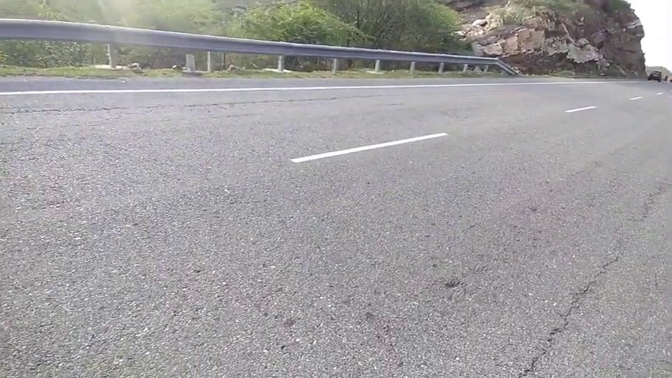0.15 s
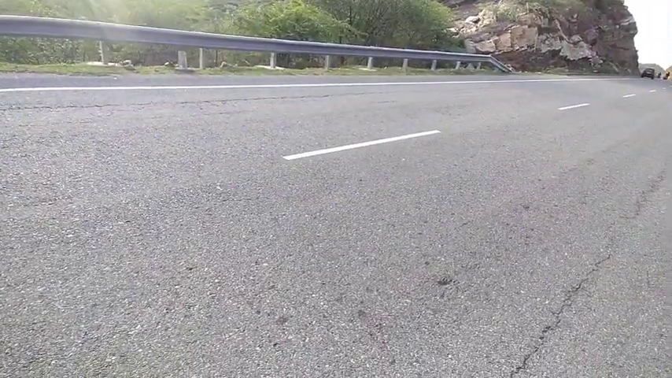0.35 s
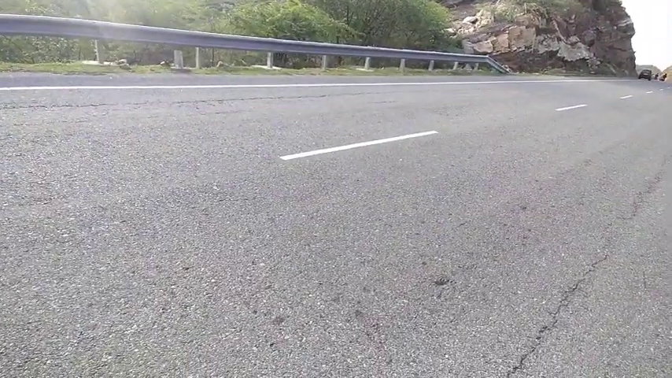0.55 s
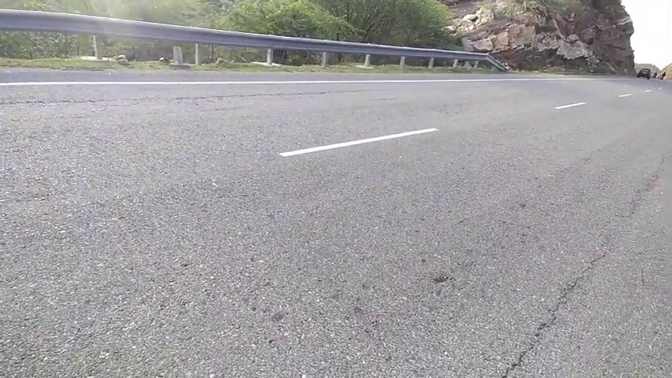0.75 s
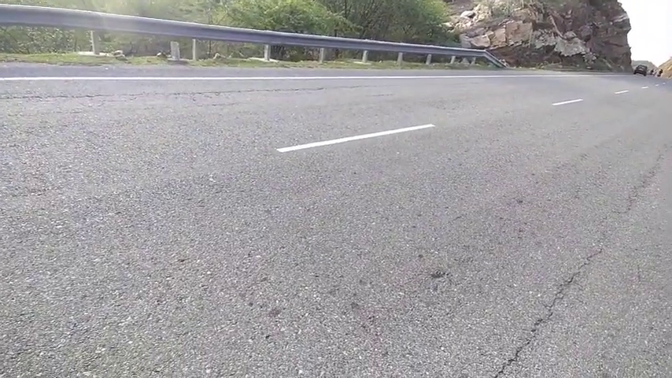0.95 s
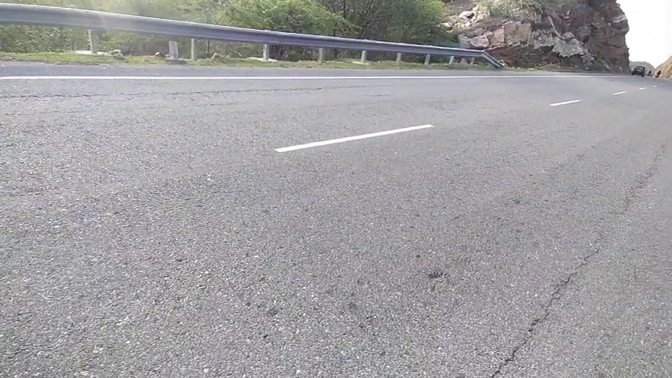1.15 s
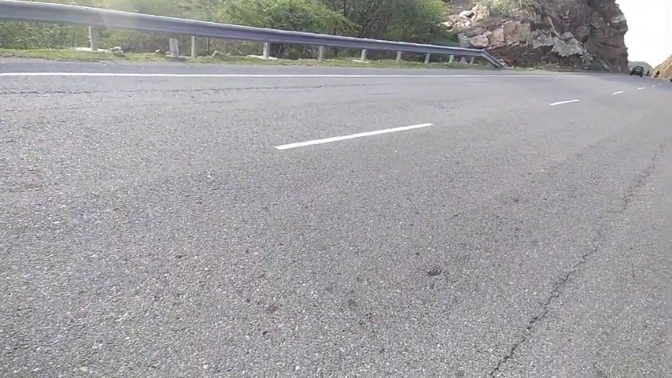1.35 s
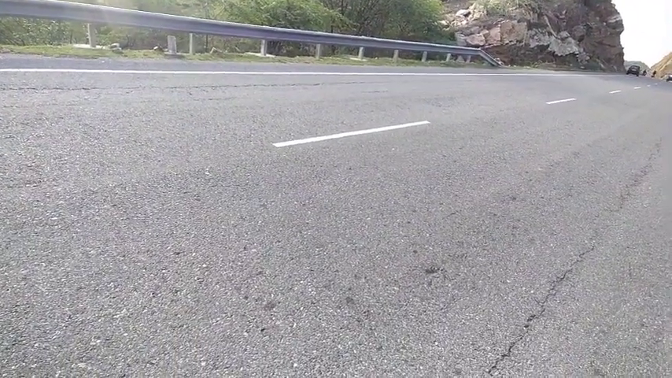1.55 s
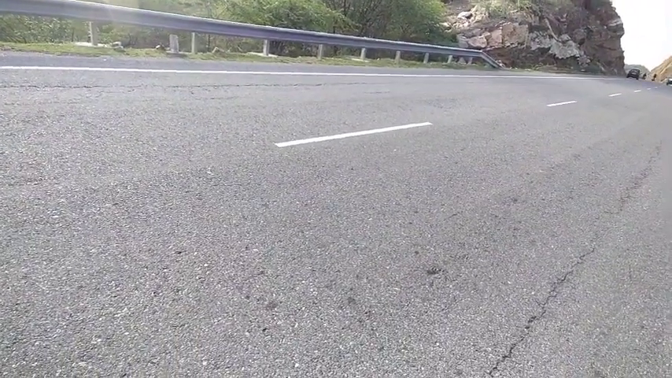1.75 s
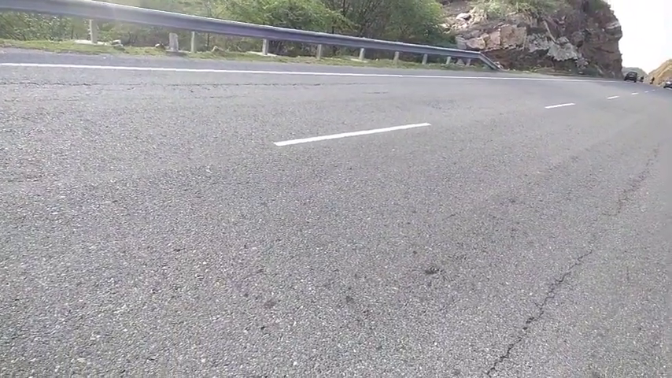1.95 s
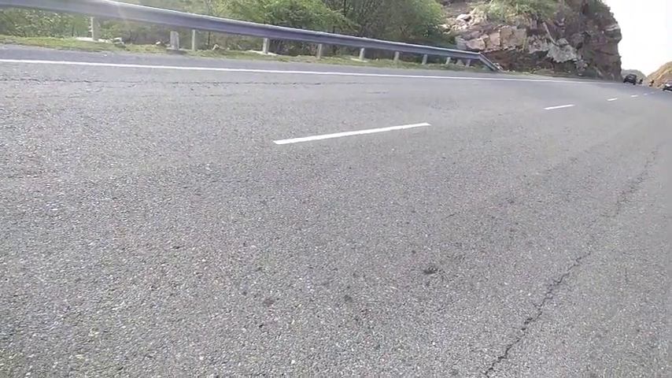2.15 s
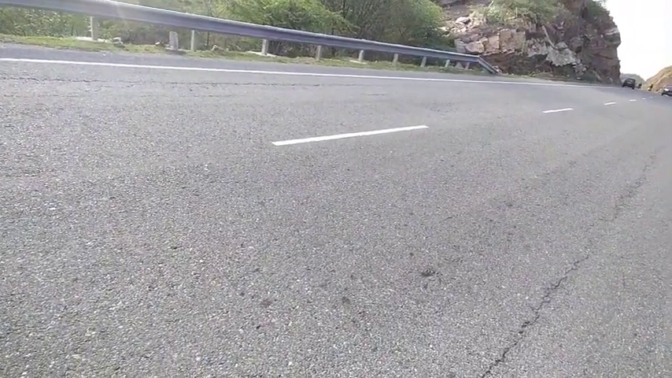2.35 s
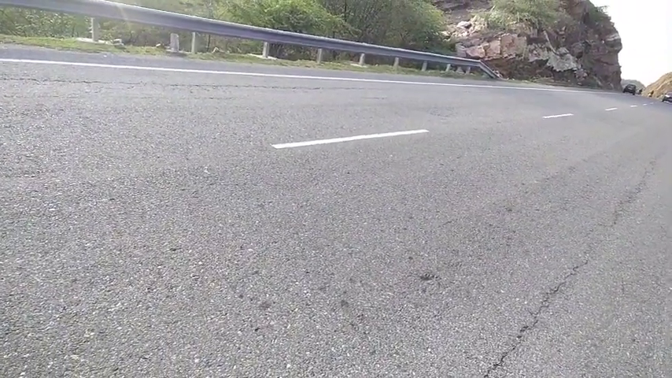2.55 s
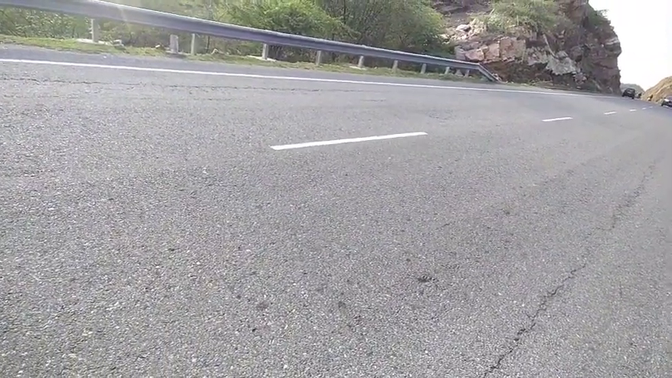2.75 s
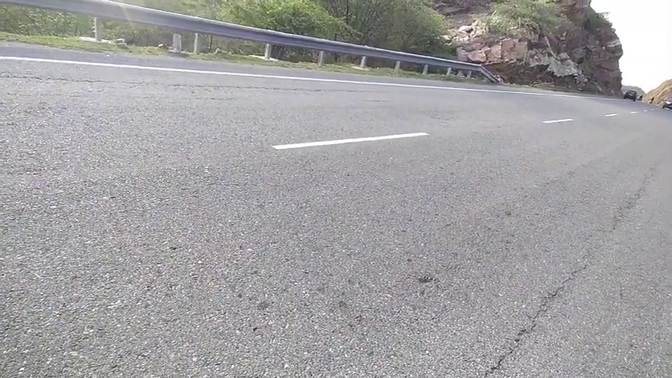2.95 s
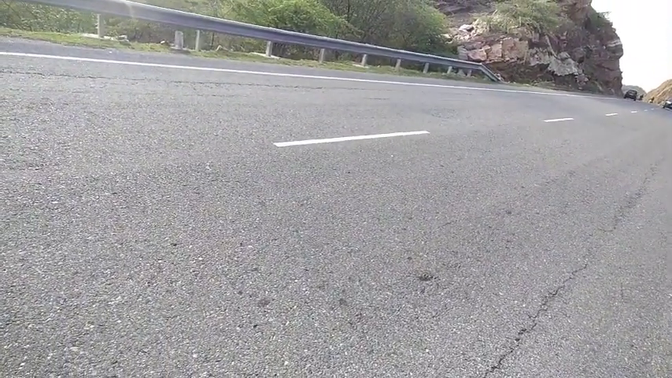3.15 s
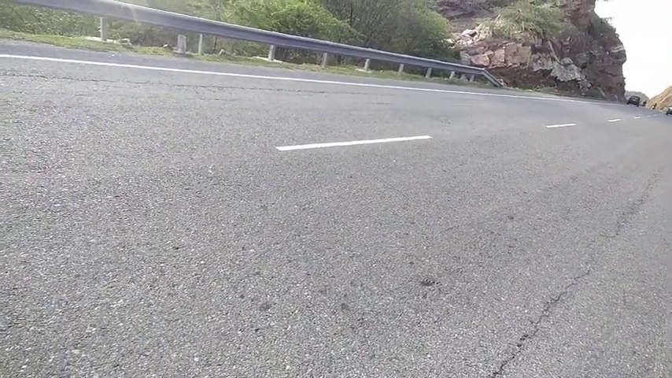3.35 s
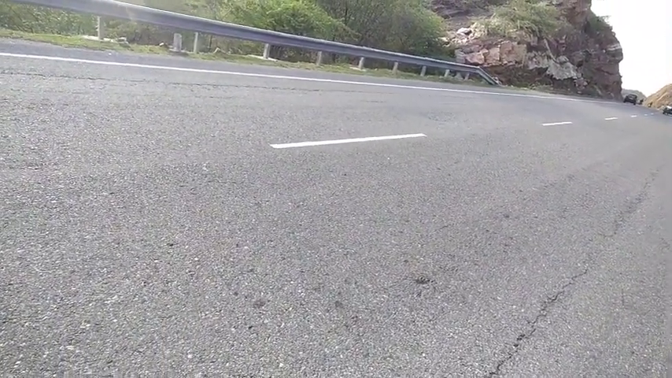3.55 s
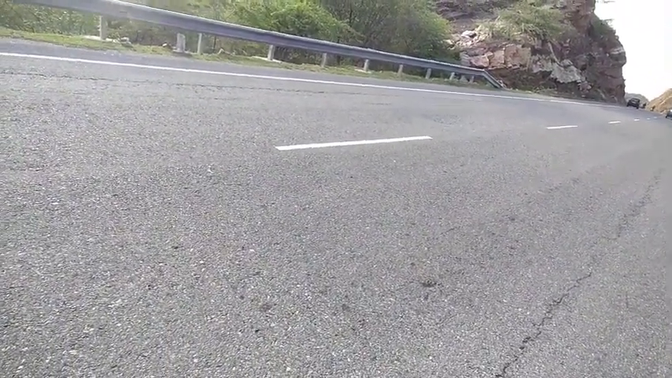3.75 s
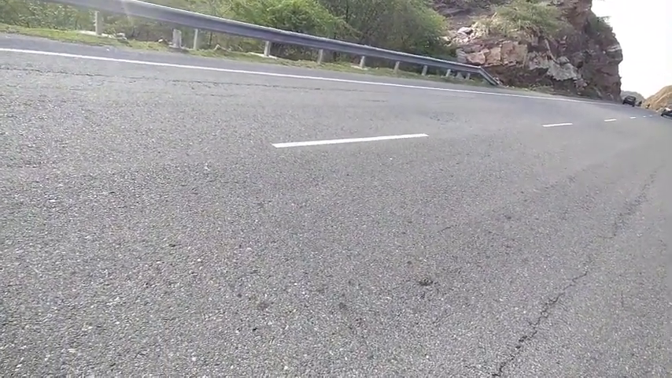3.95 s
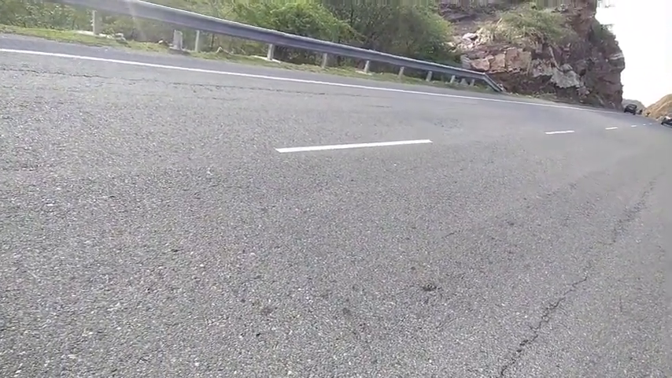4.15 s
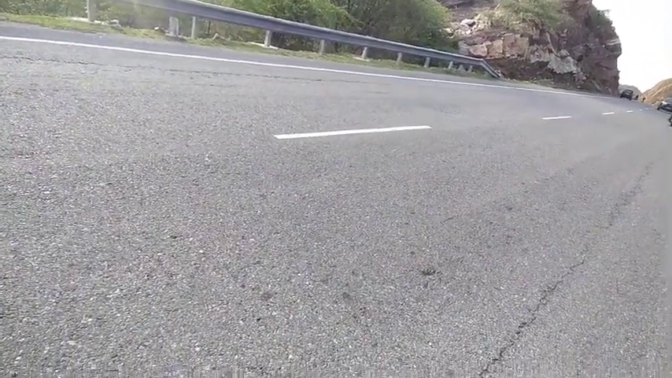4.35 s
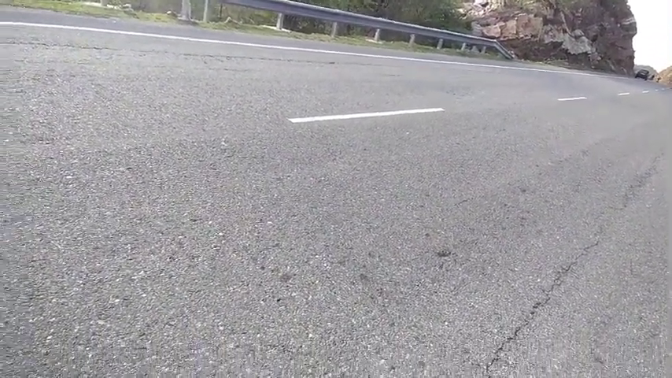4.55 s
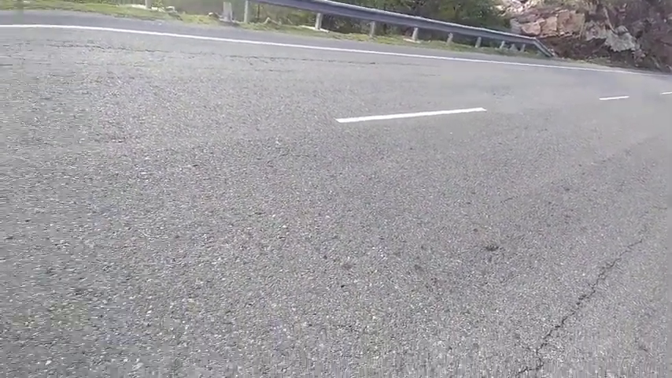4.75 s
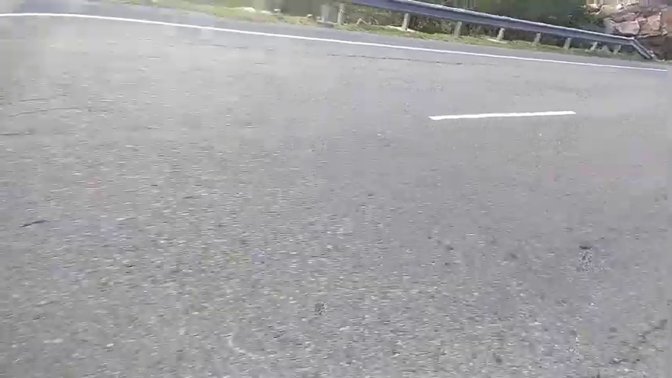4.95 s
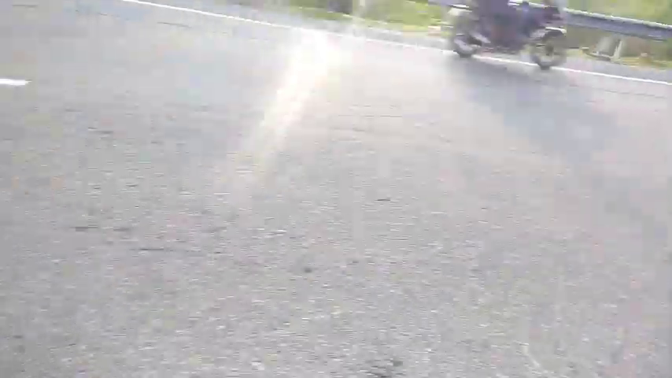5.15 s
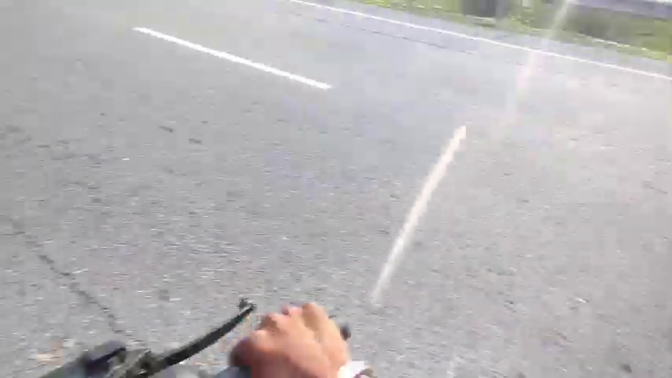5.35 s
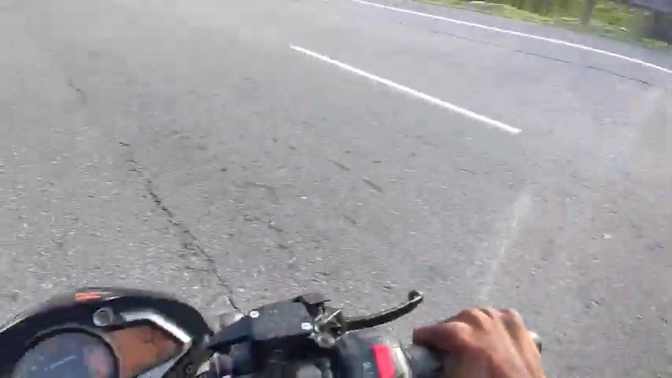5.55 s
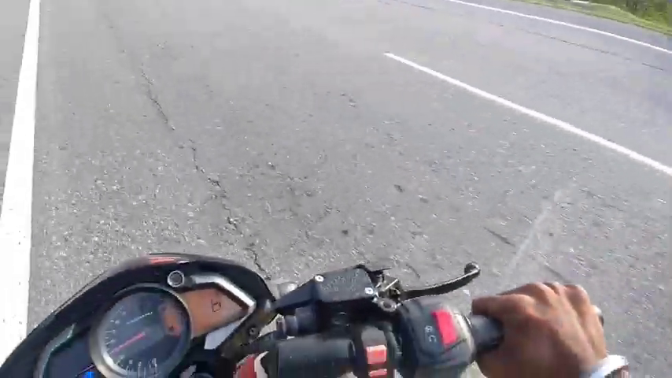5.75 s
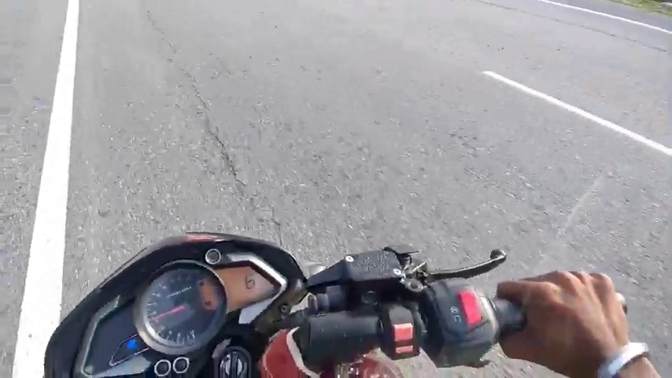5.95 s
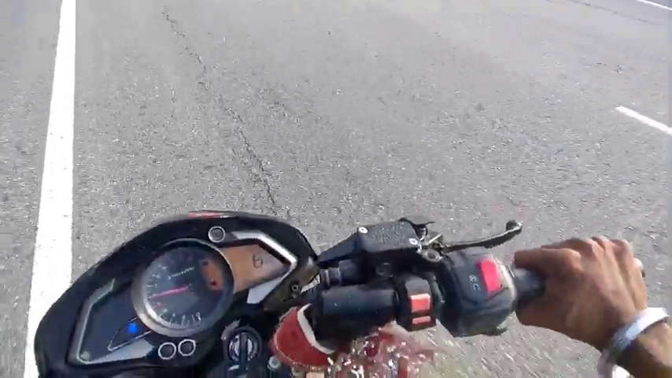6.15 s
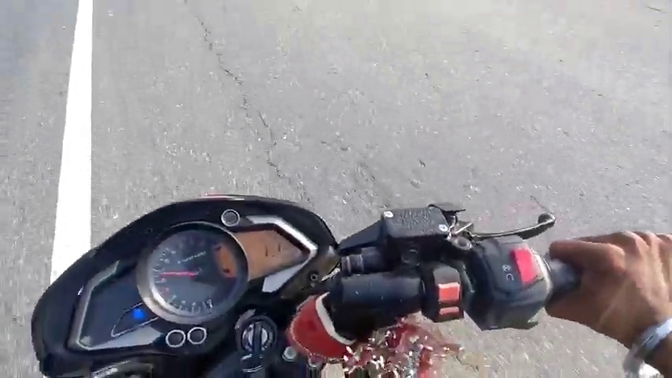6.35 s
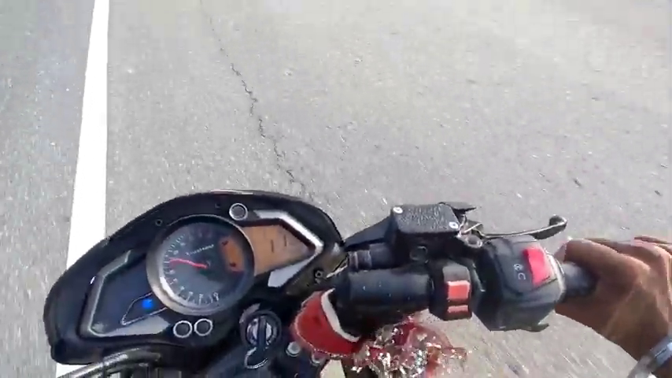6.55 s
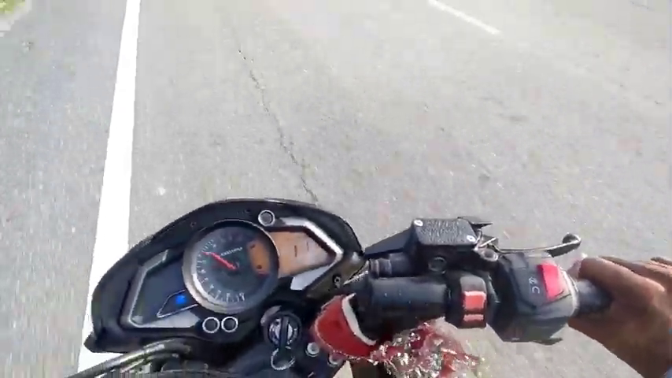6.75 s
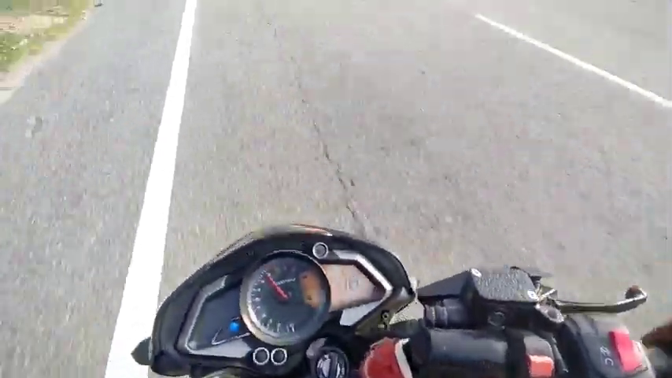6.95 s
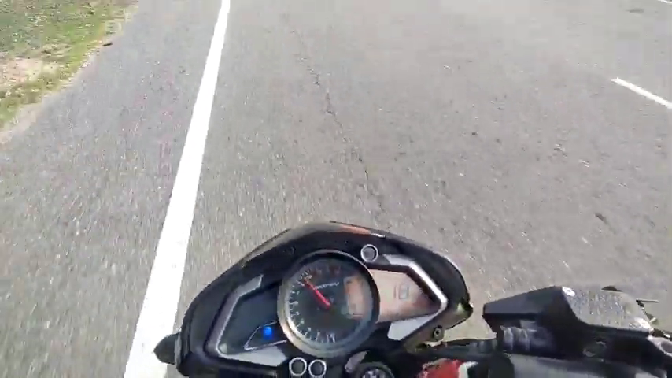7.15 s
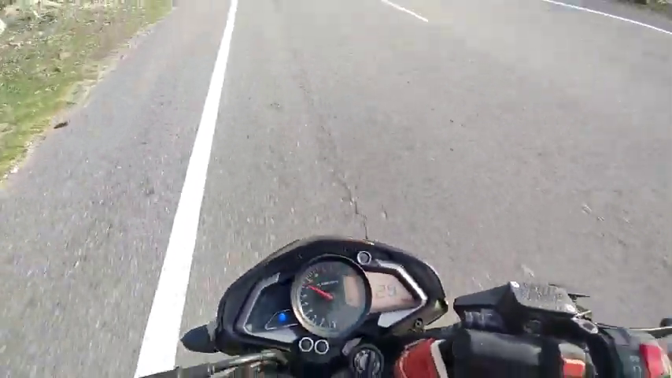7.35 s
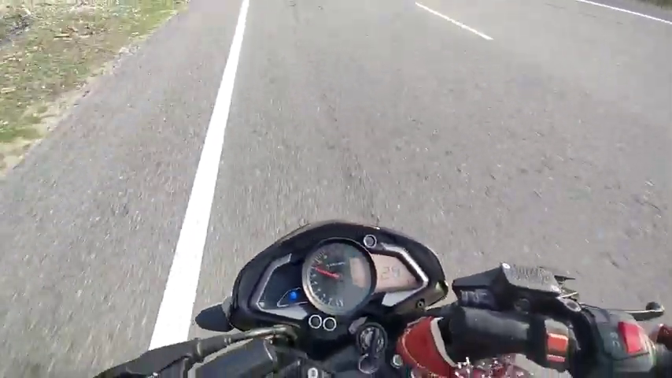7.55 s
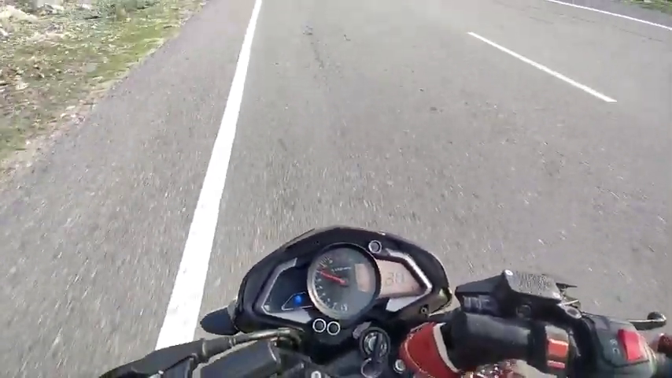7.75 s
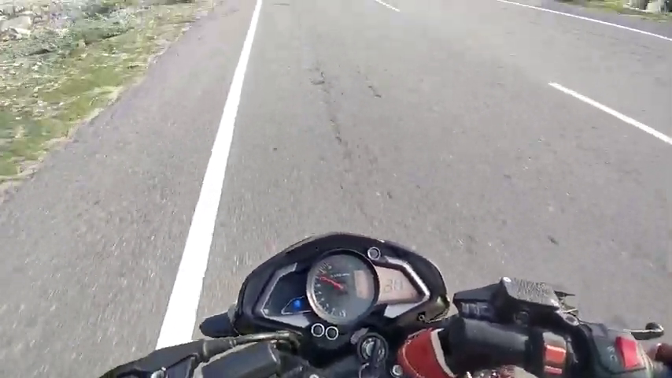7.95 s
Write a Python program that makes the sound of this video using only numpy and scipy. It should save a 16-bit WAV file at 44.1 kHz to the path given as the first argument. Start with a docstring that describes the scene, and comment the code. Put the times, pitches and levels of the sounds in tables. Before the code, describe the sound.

First, soft wind bumps and a distant bike's growing exhaust bark, which drops to a hollow overrun boom and fades. Underneath, a close single-cylinder engine ticks over slowly and revs gently. A short steel gear clunk follows, then hard acceleration with hissing, metallic chatter and high disc squeaks. After the revs dip for an upshift, ripping wind overwhelms the rider's microphone on the open road.

```python
"""On a highway, two single-cylinder motorcycles pass through wind: filtered pulse trains make their exhausts.
One cruises, gaining speed, then rolls off the throttle. The nearer one idles, is blipped, clunks into gear,
pulls away hard and shifts up; crank-locked sines and noise bursts make its intake, valves and rattles.
Shaped noise makes the wind, which buffets the microphone, grows into a tearing rush and drives a limiter.
Brief sine squeaks come from a brake disc."""
import sys
import numpy as np
from scipy import signal
from scipy.fft import rfft, irfft, next_fast_len
from scipy.io import wavfile
from scipy.ndimage import uniform_filter1d, minimum_filter1d, map_coordinates

SR = 44100
rng = np.random.default_rng(int(sys.argv[2]) if len(sys.argv) > 2 else 0)


def log_audio(samples):
    """Write samples as a 16-bit WAV file to the path given in sys.argv[1]."""
    # one column per channel
    frames = np.atleast_2d(samples).T
    # limit to full scale, then quantise
    limited = np.clip(frames, -1, 1)
    pcm = np.round(limited * 32767).astype(np.int16)
    wavfile.write(sys.argv[1], SR, pcm)


N = 356307

# Levels inside a spectrum are relative: each coloured sound is brought to rms 1 before its gain.
# firing rate of the cruising bike: time_s, firings_per_s
CRUISE_FIRING_RATE = [(0, 37.92), (0.5, 41.02), (1, 42.83), (1.8, 45.95), (2.6, 49.26), (3.0, 50.6),
                      (3.24, 51.27), (3.33, 46.69), (3.43, 47.31), (3.53, 50.24), (4, 48.26), (4.6, 46.79),
                      (5.2, 44.69), (8.08, 36.0)]
# loudness and load of the cruising bike: time_s, level_db, throttle_0_to_1
CRUISE_LEVEL_THROTTLE = [(0, -45.5, 0.85), (.7, -36.5, 0.54), (1.4, -36, 0.8), (2.2, -31, 0.98),
                         (3.22, -29.5, 0.99), (3.33, -33, 0), (3.6, -30.5, 0), (4.3, -27.5, 0.36),
                         (5, -26, 0.1), (5.6, -32, 0.44), (6.2, -38.5, 0.2), (8.08, -67, 0.16)]
# its exhaust response with the throttle open, then shut: frequency_hz, gain_db
EXHAUST_THROTTLE_OPEN = [(50, -30), (95, -1.5), (150, 3.5), (192, -7), (218, 10.5), (245, 2), (300, -5),
                         (400, -6), (440, -5), (500, -12), (585, -5.5), (655, 1.5), (735, -15),
                         (1000, -14.5), (1400, -50), (4000, -53)]
EXHAUST_THROTTLE_SHUT = [(50, -31), (95, -20), (145, 2), (195, 9.5), (240, 2.5), (300, -4.5), (380, -10),
                         (460, -2), (520, -15), (600, -6.5), (700, -10), (830, -16.5), (950, -8),
                         (1100, -20.5), (1450, -27), (4000, -40.5)]

# firing rate of the near bike: time_s, firings_per_s
NEAR_FIRING_RATE = [(0, 13.3), (.4, 12.2), (1.38, 12.2), (1.7, 15.3), (1.9, 20.5), (2.3, 26), (2.8, 26),
                    (3.25, 33.5), (3.58, 37.7), (4.3, 27.5), (5.4, 36), (5.8, 43.6), (6, 46.8),
                    (6.12, 50.3), (6.25, 54.6), (6.38, 59), (6.47, 60.5), (6.55, 65), (6.75, 69.6),
                    (6.88, 74.2), (7, 76.7), (7.15, 72.5), (7.24, 66), (7.4, 51), (7.47, 51.2), (7.65, 55),
                    (7.85, 58), (8.08, 61)]
# its twist grip (idle, a blip, pulling away, eased for the upshift, then opened a little again):
# time_s, throttle_0_to_1
NEAR_THROTTLE = [(0, 0), (1.4, 0.35), (2.3, 0.1), (3.1, 0.13), (3.4, 0.47), (3.8, 0.45), (4.2, 0.14),
                 (5.1, 0), (5.75, 0.46), (6.12, 0.73), (6.4, 0.9), (7.12, 0.97), (7.26, 0.63), (8.08, 0.75)]
# the microphone swings round towards the near engine; each sound takes a share: time_s, gain_db
FACING_GAIN = [(0, -4.5), (4.55, 2.5), (5.2, 19), (6, 16.5), (8.08, 13.5)]
# growth of each near-engine sound: level_db (at IDLE_RATE, throttle shut), db_per_doubling_of_revs,
# db_at_full_throttle, share_of_facing_gain
EXHAUST_GROWTH = (-61, 4, 16, 0.9227)
DRONE_GROWTH = (-51, 3, 24.5, 0.5052)
VALVE_GROWTH = (-60, 3, 8, 0.3545)
HISS_GROWTH = (-68, 9.5, -1, 1.0)
IDLE_RATE = 12  # firings_per_s
# response of its exhaust, then of its cylinder head: frequency_hz, gain_db
NEAR_EXHAUST_RESPONSE = [(40, -51.5), (70, -38), (95, -15), (140, 2.5), (200, -2), (250, -13), (305, 3.5),
                         (400, -7), (520, -14), (630, 1), (800, -18.5), (1500, -19), (4000, -47)]
CYLINDER_HEAD_RESPONSE = [(700, -25.5), (1500, 1.5), (2400, -2.5), (3050, 4), (3450, 7), (3700, -10.5),
                          (4300, 1.5), (5200, 8), (5600, -6), (6100, -14.5), (7000, -26)]
# modes of the engine's casing and fins: frequency_hz, width_hz, gain_db
CASING_MODES = [(1445, 64, 0.5), (1830, 120, -2.5), (2230, 27, -2), (2703, 130, 0.5), (3120, 110, -2),
                (3402, 43, -0.5), (3500, 67, -1), (3697, 29, 2.5), (3878, 34, 7), (3923, 80, -1),
                (4436, 130, -3), (4780, 140, -4), (4890, 78, -1), (5410, 59, 0), (5650, 47, 1.5)]
# the airbox lifts engine orders that sweep through its resonances: frequency_hz, gain_db
AIRBOX_RESPONSE = [(70, -25), (105, -11), (132, 2), (150, 4), (172, -5), (205, -3), (226, -14),
                   (252, -18.5), (272, -2), (300, 2), (328, -13.5), (360, -20), (400, -16.5)]
# harmonics of the intake pulse: multiple_of_firing_rate, gain_db
INTAKE_HARMONICS = [(3, -0.5), (4, 2.5), (5, -1.5), (6, -9)]
CRANK_WAVER = .009  # scale of the intake strokes' unevenness, firing cycles
FRAME_HZ, FRAME_WIDTH_HZ, FRAME_DB = 91.5, 10, -2  # frame resonance, level relative to the drone
TICK_S, OFF_TURN = 0.0044, 0.42  # decay constant of a valve tick; amplitude on the turn that does not fire

# strength of the air stream: time_s, rush_db, buffeting_db
AIR_STREAM = [(0, -54, -36.5), (1.3, -54, -35.5), (2.2, -46.5, -33.5), (3.35, -42.5, -33.5),
              (4.4, -42, -31), (5.2, -35, -26.5), (5.9, -28.5, -23.5), (6.25, -26, -20), (6.45, -25.5, -19),
              (6.62, -22, -17), (6.8, -24.5, -19.5), (7.1, -27.5, -17.5), (7.25, -19, -15),
              (7.45, -21.5, -16.5), (7.85, -20.5, -14), (8.08, -18, -15)]
SLOW_AIR_DB, FAST_AIR_DB = -37, -27  # rush levels between which the air turns from smooth to turbulent
# spectra of buffeting in slow, then fast air: frequency_hz, level_db_per_hz
SLOW_BUFFET_SPECTRUM = [(25, -42), (55, -30), (80, -10.5), (115, -1.5), (160, -1.5), (250, -6.5),
                        (400, -15), (700, -25), (1100, -30.5), (2500, -53)]
FAST_BUFFET_SPECTRUM = [(25, -40.5), (60, -26.5), (85, -14.5), (125, 1), (200, 0), (300, 0.5), (450, -7.5),
                        (620, -13.5), (760, -14), (1100, -33), (2500, -43)]
# spectra of the mild rush of tyres and air at low speed, then of fast air: frequency_hz, level_db_per_hz
SLOW_RUSH_SPECTRUM = [(300, -8), (600, 0), (850, 3), (1020, 5.5), (1250, -0.5), (1600, -6), (2050, -2),
                      (2400, -7), (3000, -13), (4200, -14), (5200, -13), (6000, -21), (7000, -42.5)]
FAST_RUSH_SPECTRUM = [(200, -5.5), (500, 8), (900, 2), (1400, 1), (1750, -4), (2200, -6), (3000, -11.5),
                      (5000, -16), (7000, -48.5)]
# spectrum of the running hiss: frequency_hz, level_db_per_hz
HISS_SPECTRUM = [(1200, -11), (2600, -2), (3300, -3), (3900, 1), (4300, 2), (4800, -0.5), (5500, -5.5),
                 (6200, -5), (6900, -27), (7600, -31.5), (8000, -62)]
# gusts that thump the microphone: centre_s, level_db, bell_sigma_s, pitch_hz, sharpness_0_to_1
GUST_THUMPS = [(0.078, -26.5, 0.019, 144, 0.05), (0.544, -19.5, 0.015, 171, 0.12),
               (0.558, -17.5, 0.0065, 302, 0.18), (0.58, -21, 0.014, 150, 0.04),
               (0.977, -31, 0.019, 173, 0), (1.068, -21.5, 0.024, 171, 0.15),
               (1.81, -24.5, 0.007, 160, 0.13), (2.275, -25.5, 0.009, 235, 0.07),
               (2.844, -27.5, 0.0086, 199, 0.74), (3.418, -24, 0.0089, 151, 0),
               (3.736, -26.5, 0.025, 155, 0.07), (4.612, -23.5, 0.026, 165, 0),
               (5.04, -13.5, 0.0083, 230, 0.28), (5.437, -19.5, 0.0035, 294, 0.13),
               (5.492, -19.5, 0.0097, 191, 0), (5.854, -19, 0.02, 180, 0.67),
               (6.066, -14.5, 0.013, 174, 0.02), (6.106, -2.5, 0.009, 200, 0.95), (6.22, -14, 0.03, 210, 0),
               (6.616, -16, 0.086, 200, 0.98), (7.014, -14, 0.013, 350, 0.75),
               (7.292, -14, 0.075, 258, 0.37)]

# brief squeaks of the brake disc: start_s, length_s, pitch_hz (of the lower mode), level_db
DISC_SQUEAKS = [(0.747, 0.061, 2300, -65), (4.864, 0.13, 2195, -42), (5.943, 0.076, 2650, -28.5),
                (6.006, 0.06, 2635, -31), (6.073, 0.076, 2640, -32.5), (6.149, 0.016, 2650, -31.5)]
UPPER_MODE_RATIO, UPPER_MODE_DB = 1.143, -11.5  # the disc's second, fainter mode
# gearbox clunks, levels relative to each other: start_s, level_db, t60_s
GEAR_CLUNKS = [(4.122, -22, 0.061), (4.182, -35.5, 0.081)]
# spectrum of the gearbox steel: frequency_hz, level_db_per_hz
GEARBOX_SPECTRUM = [(530, -10), (900, -3), (1210, 0.5), (1550, -19), (2030, -8), (2260, -10.5), (3240, -10),
                    (3610, -18), (3770, -7), (5110, -5.5), (6230, -16), (7060, -41), (7650, -46),
                    (9940, -75), (16800, -120)]
# rattles of loose parts in fairing and cockpit, each swelling around its own moment:
# centre_s, bell_sigma_s, pitch_hz, width_hz, level_db
FAIRING_RATTLES = [(5.722, 0.15, 3390, 120, -44), (6.347, 0.11, 3070, 160, -40.5),
                   (6.407, 0.096, 3370, 259, -32), (6.37, 0.043, 4210, 240, -34),
                   (6.454, 0.18, 5510, 260, -40), (6.58, 0.041, 3540, 1100, -32.5),
                   (6.717, 0.25, 3005, 130, -38.5), (6.757, 0.055, 4830, 700, -33.5),
                   (7.65, 0.15, 4490, 200, -41), (7.796, 0.41, 3877, 100, -40)]
# single tears of fast air at the microphone port, strong and faint, at set moments:
# centre_s, level_db, bell_sigma_s, pitch_hz
AIR_TEARS = [(6.95, -21, 0.0033, 1110), (7.019, -18.5, 0.0025, 1200), (7.046, -19, .004, 900),
             (7.123, -21, .002, 900), (7.19, -18, .002, 1000), (7.274, -20, 0.0027, 1870),
             (7.286, -11.5, 0.0021, 1580), (7.317, -16, 0.003, 1200), (7.364, -32, 0.0034, 1780),
             (7.518, -14, 0.0012, 1730), (7.632, -16, 0.0011, 1800), (7.652, -15, .003, 1300),
             (7.665, -16.5, 0.0016, 1670), (7.735, -21, 0.0041, 2070), (7.773, -17, 0.0014, 1300),
             (7.875, -21, .002, 1590), (7.972, -16.5, 0.0016, 1680), (8.012, -13, 0.0013, 1900),
             (8.032, -19, 0.0015, 2000)]
# further tears come at random in fast air
TEARS_PER_S, TEAR_OVER_RUSH_DB, TEAR_SCATTER_DB, TEAR_SIGMA_S = 110, 1, 2, 0.00072
TEAR_HZ, TEAR_SPREAD_OCTAVES = 1200, 0.52  # their usual pitch and its scatter
TEAR_WIDTH = 1.07  # bandwidth over pitch, for every tear
TOP_HZ = 7900  # upper edge of the final band


def amp(db):
    """The decibel is logarithmic: 20 dB is a tenfold amplitude."""
    return 10 ** (np.asarray(db) / 20)


def unit(x):
    """Normalisation of power: x scaled to rms 1."""
    return x / np.sqrt(np.mean(x ** 2) + 1e-20)


def curves(rows):
    """Linear interpolation: one value per sample for each column after the time."""
    s, *cols = np.transpose(rows)
    return [np.interp(np.arange(N) / SR, s, c) for c in cols]


def wobble(rate):
    """Slow random modulation: a smooth curve through random knots, rate knots a second."""
    knots = rng.standard_normal(int(N * rate / SR) + 4)
    return map_coordinates(knots, [np.arange(N) * rate / SR])


def bell(s, sigma_s):
    """Gaussian envelope: a smooth swell around the moment s."""
    return np.exp(-.5 * np.minimum(((np.arange(N) / SR - s) / sigma_s) ** 2, 60))


def coloured(x, points):
    """Minimum-phase filtering: a causal response with the (Hz, dB) gains, falling away beyond both ends."""
    size = 2 * next_fast_len(N // 2 + 8192)
    hz, db = np.transpose(points)
    grid = np.log(np.fft.rfftfreq(size, 1 / SR) + 1)
    knots = np.log([hz[0] / 2, *hz, hz[-1] * 2])
    gain = amp(np.interp(grid, knots, [db[0] - 20, *db, db[-1] - 40]))
    # folding the cepstrum onto positive time makes the response causal
    cepstrum = irfft(np.log(gain))[:size // 2]
    cepstrum[1:] *= 2
    return irfft(rfft(x, size) * np.exp(rfft(cepstrum, size)))[:N]


def noise(points):
    """Spectral shaping of white noise, at rms 1."""
    return unit(coloured(rng.standard_normal(N), points))


def band(x, hz, width_hz, order):
    """Band-pass selection: x around one pitch, at rms 1."""
    centre = np.hypot(hz, width_hz / 2)
    edges = [centre - width_hz / 2, centre + width_hz / 2]
    return unit(signal.sosfilt(signal.butter(order, edges, "bandpass", fs=SR, output="sos"), x))


def ringing(x, modes):
    """Modal resonance: x through a bank of (Hz, width, dB) damped oscillators."""
    size = next_fast_len(N + 8192)
    f = np.fft.rfftfreq(size, 1 / SR)
    response = 0
    for k, (hz, width_hz, db) in enumerate(modes):
        resonance = 1j * f * width_hz / (hz * hz - f * f + 1j * f * width_hz)
        response = response + (-1) ** k * amp(db) * resonance  # neighbours have opposite sign
    damping = 1 / (1 + (f / 6100) ** 24)  # the metal hardly rings above its last mode
    return irfft(rfft(x, size) * response * damping, size)[:N]


def firings(rate, scatter_db, jitter_s):
    """Periodic excitation: one pulse a cycle, uneven in size and time; power does not depend on the rate."""
    cycles = np.cumsum(rate) / SR
    at = np.interp(np.arange(1, cycles[-1]), cycles, np.arange(N))
    chance = rng.standard_normal((len(at), 2))
    at = np.clip(np.round(at + jitter_s * SR * chance[:, 0]), 0, N - 1).astype(int)
    return np.bincount(at, amp(scatter_db * chance[:, 1]) / np.sqrt(rate[at]), N)


def cruising_bike():
    """Pulse excitation of a pipe: a bark under throttle, a deeper boom on the overrun."""
    rate, = curves(CRUISE_FIRING_RATE)
    db, throttle = curves(CRUISE_LEVEL_THROTTLE)
    throttle = np.clip(throttle, 0, 1)
    pulses = -firings(rate, scatter_db=0.65, jitter_s=.00004)
    db = db + 1.0 * wobble(7)  # moving air carries the sound unevenly
    bark = unit(coloured(pulses, EXHAUST_THROTTLE_OPEN))
    boom = unit(coloured(pulses, EXHAUST_THROTTLE_SHUT))
    return amp(db) * (throttle * bark + (1 - throttle) * boom)


def engine_gain(growth):
    """Source strength: a near-engine sound changes with revs, throttle and the turn of the microphone."""
    idle_db, revs_db, throttle_db, facing_share = growth
    rate, = curves(NEAR_FIRING_RATE)
    throttle, = curves(NEAR_THROTTLE)
    facing_db, = curves(FACING_GAIN)
    engine_db = idle_db + revs_db * np.log2(rate / IDLE_RATE) + throttle_db * np.clip(throttle, 0, 1)
    return amp(engine_db + facing_share * facing_db)


def near_bike():
    """Synchronous sources: exhaust, intake drone, valve clatter and rattles all follow the crank."""
    rate, = curves(NEAR_FIRING_RATE)
    cycles = np.cumsum(rate) / SR  # one firing cycle is two crank turns
    pulses = firings(rate, scatter_db=2.0, jitter_s=.00005)
    exhaust = engine_gain(EXHAUST_GROWTH) * unit(coloured(pulses, NEAR_EXHAUST_RESPONSE))
    drone = engine_gain(DRONE_GROWTH) * intake(rate, cycles)
    clatter = engine_gain(VALVE_GROWTH) * valves(rate, cycles)
    return exhaust + drone + clatter + fairing(cycles)


def intake(rate, cycles):
    """Swept resonance: engine orders swell and fade through the airbox; the frame hums with the crank."""
    box_hz, box_db = np.transpose(AIRBOX_RESPONSE)
    frame_gain = amp(FRAME_DB) / np.hypot(1, 2 * (2 * rate - FRAME_HZ) / FRAME_WIDTH_HZ)
    drone = frame_gain * np.sin(2 * np.pi * 2 * cycles)  # shaken once a crank turn
    strokes = cycles + CRANK_WAVER * wobble(70)
    for order, db in INTAKE_HARMONICS:
        order_db = db + np.interp(order * rate, box_hz, box_db) + 1.8 * wobble(30)
        drone += amp(order_db) * np.sin(2 * np.pi * order * strokes)
    return np.sqrt(2) * drone


def valves(rate, cycles):
    """Impact excitation: a tick each crank turn, louder when firing; at high revs the ticks run together."""
    age = (2 * cycles % 1) / (2 * rate)
    ticks = np.exp(-age / TICK_S) * np.where(cycles % 1 > .5, OFF_TURN, 1)
    head = unit(coloured(ticks * rng.standard_normal(N), CYLINDER_HEAD_RESPONSE))
    casing = unit(ringing(ticks * rng.standard_normal(N), CASING_MODES))
    return 0.53 * head + 0.51 * casing


def wind():
    """Turbulence: buffeting rises in pitch with air speed and eddies tear the rush; over it runs the near
    engine's mechanical hiss, coloured by its metal and growing with revs."""
    rush_db, buffet_db = curves(AIR_STREAM)
    speed = np.clip((rush_db - SLOW_AIR_DB) / (FAST_AIR_DB - SLOW_AIR_DB), 0, 1)
    slow, fast = np.sqrt(1 - speed), np.sqrt(speed)  # equal-power crossfade
    eddies = 0.53 * wobble(110) + 0.47 * wobble(300)

    buffet_gain = amp(buffet_db + 1.5 * wobble(18) + 0.38 * eddies)
    buffet = buffet_gain * (slow * noise(SLOW_BUFFET_SPECTRUM) + fast * noise(FAST_BUFFET_SPECTRUM))

    rush_gain = amp(rush_db + (1.1 + 2.0 * speed) * eddies)
    rush = rush_gain * (slow * noise(SLOW_RUSH_SPECTRUM) + fast * noise(FAST_RUSH_SPECTRUM))

    metal = unit(ringing(rng.standard_normal(N), CASING_MODES))
    hiss_gain = engine_gain(HISS_GROWTH) * amp((1.55 + 2.4 * speed ** 2) * eddies)
    hiss = hiss_gain * (0.45 * noise(HISS_SPECTRUM) + 0.51 * metal)
    return buffet + rush + hiss


def gusts():
    """Pressure pulses: single eddies strike the microphone port, from a soft pitched bump to a hard knock."""
    air = rng.standard_normal(N)
    # spectrum of the hard knock: frequency_hz, level_db_per_hz
    knock = noise([(120, -4.0), (220, 0.0), (400, 4.0), (620, -0.5), (850, -8.5), (1300, -25.5), (3000, -39.5)])
    out = np.zeros(N)
    for s, db, sigma_s, hz, sharpness in GUST_THUMPS:
        angle = sharpness * np.pi / 2
        bump = band(air, hz, 0.78 * hz, order=3)
        out += amp(db) * bell(s, sigma_s) * (np.cos(angle) * bump + np.sin(angle) * knock)
    return out


def brake():
    """Stick-slip: the pad catches the disc in fits and starts, and two unsteady modes sing briefly."""
    t = np.arange(N) / SR
    out = np.zeros(N)
    for ratio, mode_db in [(1, 0), (UPPER_MODE_RATIO, UPPER_MODE_DB)]:
        flutter = amp(mode_db + 1.7 * wobble(110))
        waver_hz = 26 * wobble(300)
        for s, length_s, pitch_hz, db in DISC_SQUEAKS:
            on = (t > s) & (t < s + length_s)
            progress = (t[on] - s) / length_s
            swell = np.sqrt(2 * np.abs(np.sin(np.pi * progress)))
            hz = ratio * pitch_hz + waver_hz[on]
            out[on] += amp(db) * flutter[on] * swell * np.sin(2 * np.pi * np.cumsum(hz) / SR)
    return out


def gear_change():
    """Impact and decay: the dogs engage with a short steel rattle, then the chain takes up its slack."""
    t = np.arange(N) / SR
    blows = np.zeros(N)
    for s, db, t60_s in GEAR_CLUNKS:
        age = np.maximum(t - s, 0)
        onset = 1 - np.exp(-age / 0.0019)
        blows += amp(np.maximum(db - 60 * age / t60_s, -200)) * onset
    return 1.3 * blows * noise(GEARBOX_SPECTRUM)


def fairing(cycles):
    """Forced vibration: loose parts chatter once a firing, each swelling around its own moment."""
    chatter = np.exp(-(cycles % 1) / 0.33) * rng.standard_normal(N)
    return sum(amp(db) * bell(s, sigma_s) * band(chatter, hz, width_hz, order=2)
               for s, sigma_s, hz, width_hz, db in FAIRING_RATTLES)


def random_tears():
    """Poisson arrivals: random rips, kept only in fast air, louder with a stronger air stream."""
    rush_db, _ = curves(AIR_STREAM)
    at = np.cumsum(rng.exponential(size=1300)) / TEARS_PER_S
    chance = rng.standard_normal((len(at), 2))
    rows = []
    for s, (size, pitch) in zip(at, chance):
        if s * SR < N and rush_db[int(s * SR)] > FAST_AIR_DB:
            db = rush_db[int(s * SR)] + TEAR_OVER_RUSH_DB + TEAR_SCATTER_DB * size
            rows.append((s, db, TEAR_SIGMA_S, TEAR_HZ * 2 ** (TEAR_SPREAD_OCTAVES * pitch)))
    return rows


def tears():
    """Turbulent bursts: single tears at set moments, strong and faint, over a random crackle."""
    reach = 1024  # samples either side of a tear
    t, f = np.arange(-reach, reach) / SR, np.fft.rfftfreq(2 * reach, 1 / SR)
    air, out = rng.standard_normal(N + SR), np.zeros(N + SR)
    for s, db, sigma_s, hz in list(AIR_TEARS) + random_tears():
        on = slice(int(s * SR) - reach, int(s * SR) + reach)
        swell = np.exp(-.5 * (t / sigma_s) ** 2)
        colour = 1 / (1 + (2 * (f - hz) / (TEAR_WIDTH * hz)) ** 4)
        colour = colour / (1 + (f / 5500) ** 24)
        rip = swell * irfft(rfft(air[on]) * colour)
        # before its level, every rip gets the energy of its swell
        out[on] += amp(db) * rip * np.linalg.norm(swell) / np.linalg.norm(rip)
    return out[:N]


def scene():
    """Superposition: both bikes and the wind add at one microphone."""
    bikes = cruising_bike() + near_bike() + gear_change() + brake()
    air = wind() + gusts() + tears()
    return (bikes + air)[None]


def low_cut(x, edge_hz):
    """High-pass response: the microphone's gentle loss of deep bass."""
    size = next_fast_len(N + 8192)
    f = np.fft.rfftfreq(size, 1 / SR)
    return irfft(rfft(x, size) * (f ** 2 / (f ** 2 + edge_hz ** 2)), size)[..., :N]


def record(dry):
    """Gain control and band limiting: a fast limiter holds the peaks, then both ends of the band are cut."""
    ceiling = .55
    needed = np.minimum(1, ceiling / (np.abs(dry) + 1e-9))
    held = dry * uniform_filter1d(minimum_filter1d(needed, size=201), size=181)
    low_pass = signal.ellip(10, .1, 90, TOP_HZ, fs=SR, output="sos")
    return signal.sosfilt(low_pass, low_cut(held, edge_hz=45))


dry = scene()
out = record(dry)
log_audio(out)
```